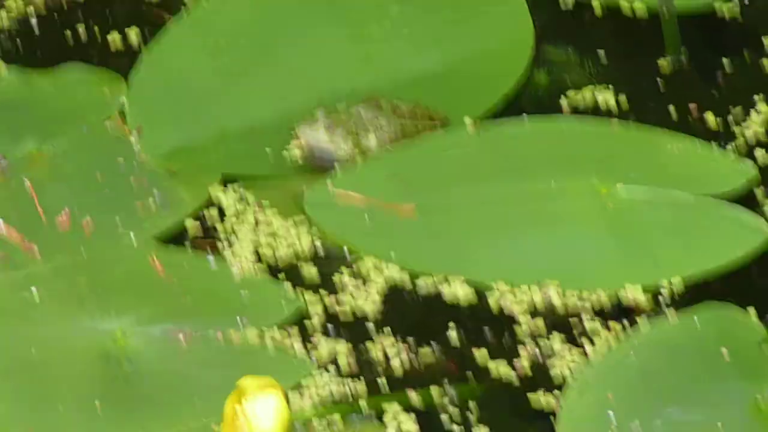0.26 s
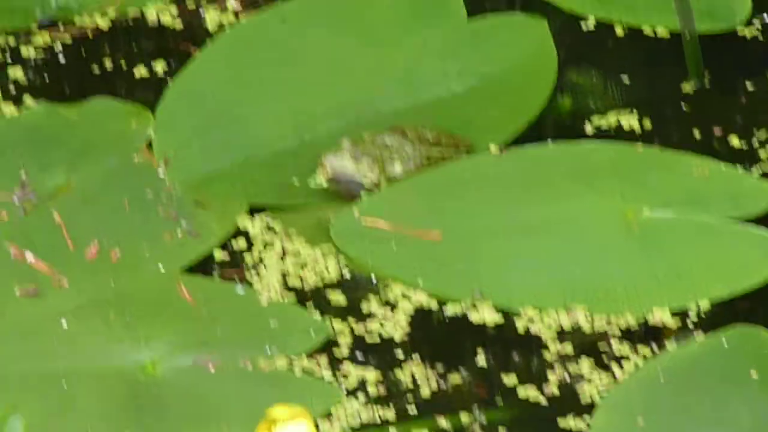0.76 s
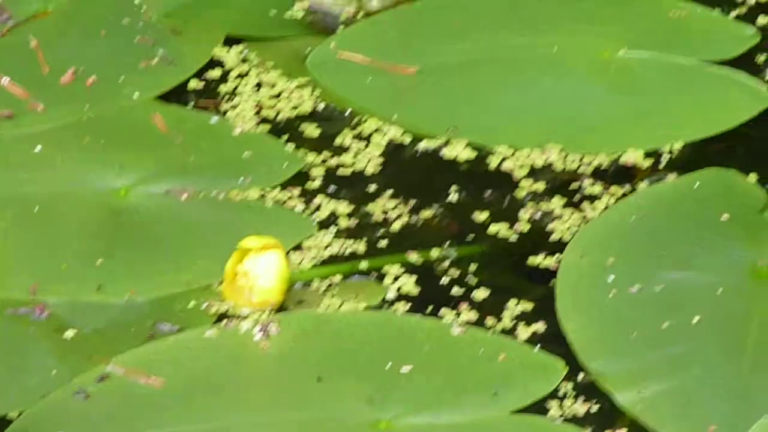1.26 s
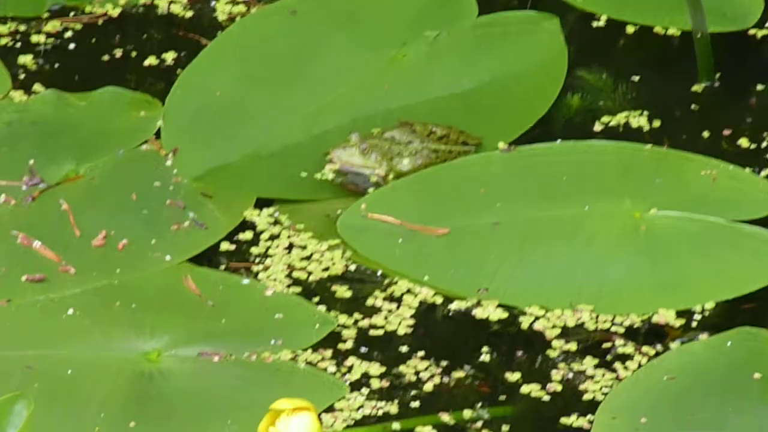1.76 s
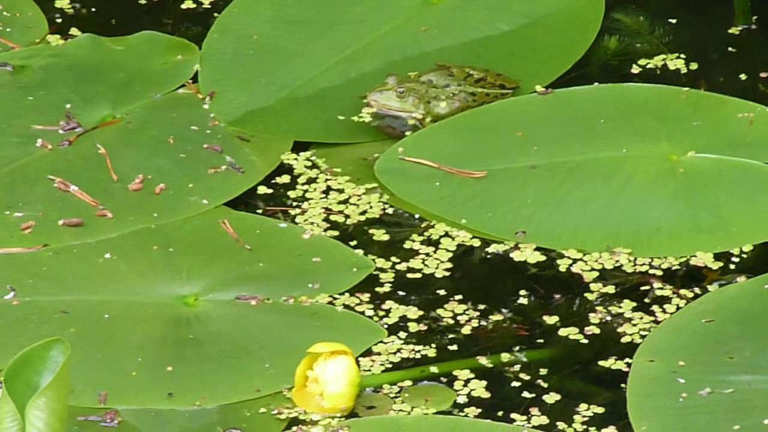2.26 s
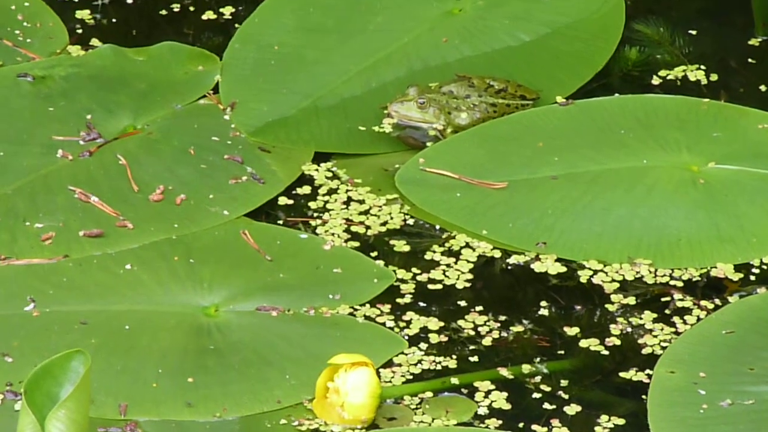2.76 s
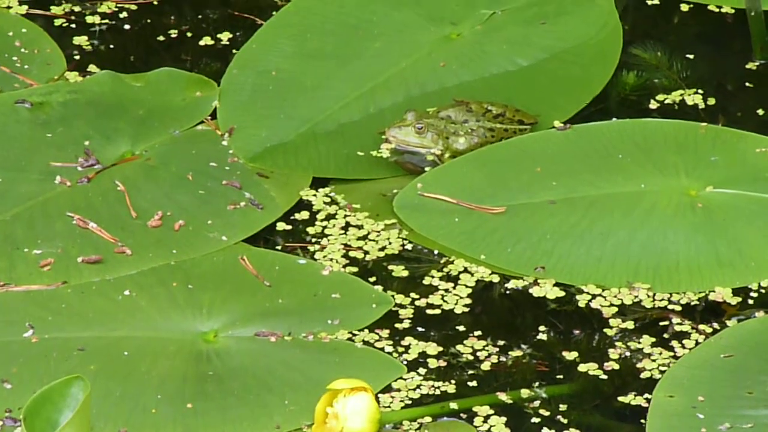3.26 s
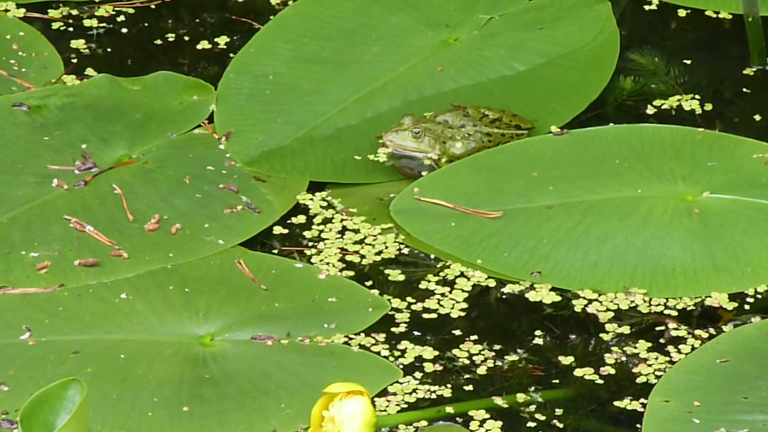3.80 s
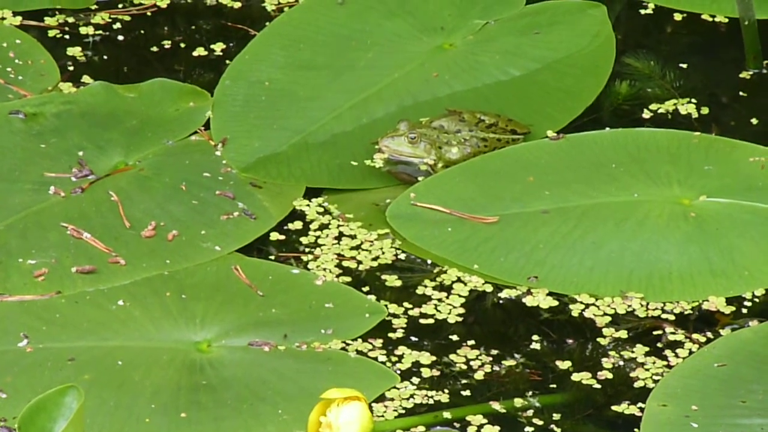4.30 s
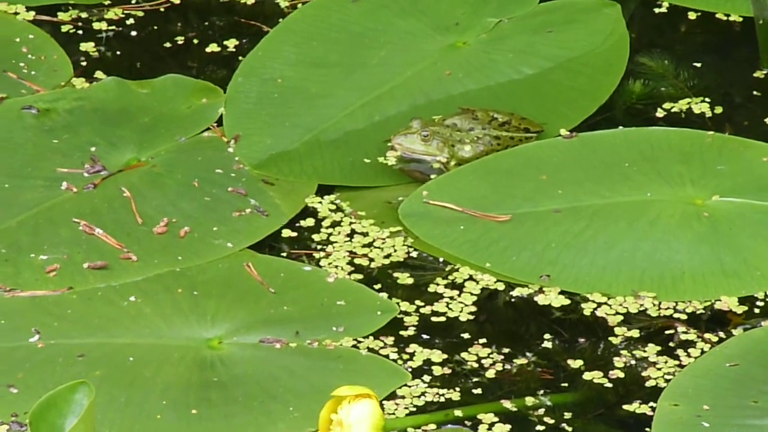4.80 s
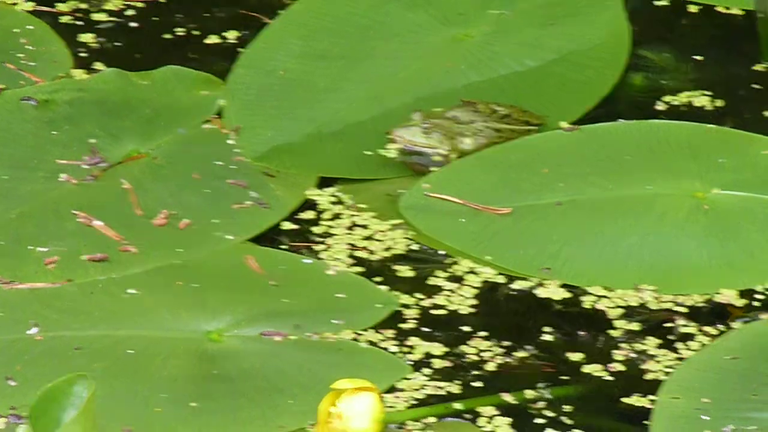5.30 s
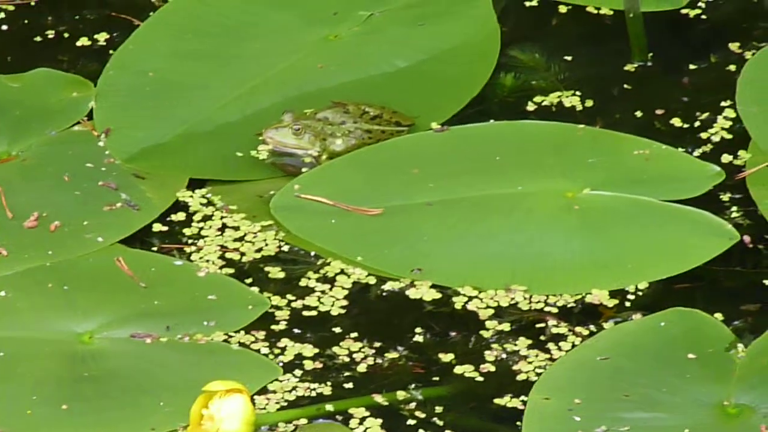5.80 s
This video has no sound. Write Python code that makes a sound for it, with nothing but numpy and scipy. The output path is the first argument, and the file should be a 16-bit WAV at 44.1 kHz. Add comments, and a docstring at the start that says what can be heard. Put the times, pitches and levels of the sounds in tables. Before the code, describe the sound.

Close, hard plastic clicks and a creak early on, then thin birdsong growing busier over faint traffic rumble and leaf hiss outdoors.

```python
"""Garden pond birds and a clicking case

Small birds sing near and far around a garden pond: wavering near-sine notes, some buzzed, some two-voiced, with
sparse echoes off trees and walls. Distant traffic and leaves are slowly swelling shaped noise, with two far
machine tones. Close by, fingers click the plastic case of a small camera: sharp releases and dying rattles ring
its modes. Its gain control then ducks the whole sound, clicks and birds alike, and its microphone colours the
sound."""
import sys
import numpy as np
from scipy import signal
from scipy.io import wavfile
from scipy.ndimage import uniform_filter1d

SR = 44100
rng = np.random.default_rng(int(sys.argv[2]) if len(sys.argv) > 2 else 0)


def digitize_waveform(pressure):
    """Quantize a signal to 16-bit integers and store it at the path in sys.argv[1].

    Rows of a 2-D input are taken as channels; values are limited to [-1, 1].
    """
    field = np.atleast_2d(pressure).T
    bounded = np.clip(field, -1, 1)
    quanta = np.round(bounded * 32767).astype(np.int16)
    wavfile.write(sys.argv[1], SR, quanta)


def field_ratio(decibels):
    """Amplitude ratio for a level in dB (20 dB per decade); scalars and array-likes work."""
    return 10 ** (np.asarray(decibels, dtype=float) / 20)


N = 266805  # length in samples


def evened(x):
    """Scales a signal to rms 1."""
    return x / np.sqrt(np.mean(x ** 2) + 1e-20)


def read(points, hz):
    """Reads a spectrum on a log-frequency axis."""
    f, value = np.transpose(points)
    return np.interp(np.log(hz + 1), np.log(f + 1), value)


def add(mix, s, sound):
    """Mixes a sound in at a time in seconds."""
    part = mix[round(s * SR):][:len(sound)]
    part += sound[:len(part)]


def wander(count, hz):
    """Smooth chance of rms 1, up to about hz: noise through two equal one-pole low-passes."""
    pole = np.exp(-2 * np.pi * hz / SR)
    noise = rng.standard_normal(count + 800)
    settled = signal.lfilter([1], [1, -2 * pole, pole ** 2], noise)[800:]
    return evened(settled)


def resonate(x, hz, width):
    """One resonance of gain 1: a complex pole, width in Hz."""
    pole = np.exp((2j * np.pi * hz - np.pi * width) / SR)
    return 2 * signal.lfilter([1 - abs(pole)], [1, -pole], x).real


def slow(curve):
    """Joins the points of a curve sample by sample."""
    s, *values = np.transpose(curve)
    return [np.interp(np.arange(N) / SR, s, v) for v in values]


def surges():
    """Gain of the far engine: a rest level with smooth bell-shaped surges added."""
    # surges of the far engine: centre_s, half_width_s, level_db
    engine_surges = [(.55, .2, -62.5), (1.5, 0.23, -61), (2.1, 0.23, -59.5), (2.95, 0.22, -57),
                     (3.38, .12, -53), (4.2, 0.33, -61), (5.5, 0.67, -68)]
    rest_db = -70
    t = np.arange(N) / SR
    return field_ratio(rest_db) + sum(field_ratio(db) * np.exp(-((t - s) / w) ** 2) for s, w, db in engine_surges)


def air():
    """Distant background: random short-time spectra, hum below and patchy leaves above, and two far tones."""
    # colour of the background before the hum and leaves are levelled: hz, relative_db_per_hz
    background = [(20, -22), (45, -2.5), (70, -3.5), (128, -6), (200, -3), (300, -5), (400, -4),
                  (700, -6.5), (1500, -12.5), (2200, -14.5), (3300, -15.5), (5000, -19.5), (6500, -29),
                  (8000, -22)]
    # slow swelling of the two layers: time_s, hum_db, leaves_db
    swell = [(0., -49, -51.5), (.6, -50, -51.5), (1.3, -50.5, -54.5), (1.92, -52, -52.5), (3., -51, -50.5),
             (4.2, -51, -52.5), (5., -51.5, -51), (6.05, -51, -49.5)]
    # steady far machine: pitch_hz, width_hz, level_db
    drone_hz, width_hz, drone_db = (79, 5, -61.5)
    frames, hz = N // 256 + 5, np.fft.rfftfreq(1024, 1 / SR)
    a, b, patches = rng.standard_normal((frames, 513, 3)).T
    patches = uniform_filter1d(patches, 10, 0)  # across frequency
    patches = evened(uniform_filter1d(patches, 12, 1))  # across time
    shape = field_ratio(read(background, hz))[:, None]
    high = 1 / (1 + (1200 / (hz[:, None] + 1)) ** 4)  # share of the leaves, half at 1200 Hz

    def layer(share):
        spectra = (a + 1j * b) * shape * share
        return evened(signal.istft(spectra, nperseg=1024, noverlap=768)[1][:N])

    hum_db, leaves_db = slow(swell)
    hum = field_ratio(hum_db) * layer(1 - high)
    leaves = field_ratio(leaves_db) * layer(high * field_ratio(1.3 * patches))
    fuzz = evened(resonate(rng.standard_normal(N), drone_hz, width_hz))
    drone = evened(np.sin(2 * np.pi * drone_hz * np.arange(N) / SR) + 0.22 * fuzz)
    engine = evened(resonate(rng.standard_normal(N), 192.2, 8.3))  # Hz, width Hz
    return hum + leaves + field_ratio(drone_db) * drone + surges() * engine


def columns(rows):
    """Start, soft-ended envelope and smoothly joined control columns of one note."""
    s, *values = np.transpose(rows)
    t = np.arange(s[0], s[-1], 1 / SR)
    ends = np.sin(np.pi / 2 * np.clip(np.minimum(t - s[0], s[-1] - t) / 0.0044, 0, 1))
    joined = [uniform_filter1d(np.interp(t, s, v), 200, mode="nearest") for v in values]
    return s[0], ends * 2 ** .5, joined  # root 2 makes the level of a sine its rms


def angle(hz, waver):
    """Phase of a voice whose pitch wavers by a small rms share."""
    wavering_hz = hz * (1 + waver * wander(len(hz), 120))
    return 2 * np.pi * (np.cumsum(wavering_hz) / SR + rng.random())


def whistles(notes, waver, flutter_db, octave_db, buzz_hz=150, swing=1.4):
    """Near-sine notes with a faint octave; a buzz shakes pitch and level, moving air makes them flutter."""
    out = np.zeros(N)
    for rows in notes:
        s, ends, (hz, db, buzz) = columns(rows)
        shake = angle(np.full(len(hz), buzz_hz), 0.33)
        phase = angle(hz, waver) + swing * buzz * np.sin(shake)
        level_shake = 1 + np.clip(buzz, 0, 1) * np.cos(shake + 1.6)
        flutter = evened(field_ratio(flutter_db * wander(len(hz), 170)) * level_shake)
        tone = np.sin(phase) + field_ratio(octave_db) * np.sin(2 * phase)
        add(out, s, ends * field_ratio(db) * flutter * tone)
    return out


def arch(u, top, start, end):
    """Zero at the share top of a note, curving to start and end at its two ends."""
    return np.where(u < top, start * (1 - u / top) ** 2, end * ((u - top) / (1 - top)) ** 2)


def glides(notes, buzz):
    """Controls of notes that slide evenly between two pitches and swell in the middle."""
    ends_db = -3.5
    u = np.linspace(0, 1, num=12)
    controls = []
    for s, length, from_hz, to_hz, db in notes:
        hz = from_hz + (to_hz - from_hz) * u
        controls.append(np.c_[s + u * length, hz, db + arch(u, .5, ends_db, ends_db), buzz + 0 * u])
    return controls


def high_birds():
    """Several birds in the trees: thin high whistles with very little octave."""
    # notes, level at mid-note: start_s, length_s, from_hz, to_hz, level_db
    peeps = [(0., .045, 3790, 4250, -58), (.045, .03, 4300, 4800, -64), (.13, 0.077, 6200, 6290, -68.5),
             (.17, 0.1, 3750, 3850, -60.5), (.238, .014, 2300, 2080, -55.5), (.245, .012, 3280, 3470, -54),
             (.415, 0.038, 5000, 4930, -55.5), (.47, .05, 4890, 4780, -64), (.55, .06, 4870, 4960, -59.5),
             (.69, .1, 4750, 4850, -62.5), (2.06, .055, 5870, 5650, -70), (2.135, 0.051, 4030, 3940, -56),
             (2.195, .015, 4800, 4360, -59), (2.465, .07, 3430, 3340, -58), (2.835, 0.022, 4370, 4430, -52),
             (3.7, 0.054, 5020, 4960, -63), (3.78, .04, 6600, 3560, -65), (3.83, 0.055, 3310, 3320, -68),
             (4., 0.044, 5900, 5080, -61.5), (4.02, 0.092, 3810, 3670, -61.5),
             (4.1, .035, 3820, 3870, -57.5), (4.082, .02, 7450, 5300, -52.5),
             (4.105, 0.038, 5000, 4070, -60), (4.13, 0.073, 4070, 3860, -58),
             (4.43, 0.026, 6600, 5550, -61.5), (4.45, .014, 5640, 4370, -56.5),
             (4.763, .022, 5800, 3930, -52), (4.785, 0.072, 3980, 3920, -53),
             (5.09, 0.032, 6570, 3400, -54), (5.125, 0.038, 3366, 3250, -50.5),
             (4.22, 0.024, 4420, 4600, -59), (4.32, .02, 5130, 5530, -61),
             (4.335, 0.097, 4455, 4420, -57.5), (4.535, .03, 4700, 4300, -60),
             (4.55, 0.012, 5220, 5600, -59), (4.608, .022, 3720, 4280, -53), (4.63, 0.035, 4280, 4300, -51),
             (4.66, 0.026, 4290, 3590, -53), (4.615, .025, 4600, 5100, -59), (4.64, .03, 5050, 4460, -59),
             (4.688, 0.025, 6570, 6020, -64), (4.715, .045, 6200, 5580, -60),
             (4.76, 0.035, 5600, 5640, -63), (4.69, 0.083, 3930, 3960, -62), (4.73, .17, 6560, 6300, -66),
             (4.78, .12, 4990, 4900, -65), (4.85, 0.063, 6100, 5580, -68.5),
             (4.88, 0.018, 4500, 4400, -53.5), (5.015, 0.056, 5280, 5140, -61),
             (5.08, 0.036, 5070, 5070, -63), (5.115, .06, 5680, 5260, -66.5),
             (5.29, 0.028, 6280, 5660, -62.5), (5.315, .03, 5650, 5460, -60),
             (5.345, 0.024, 5470, 5060, -57), (5.37, .03, 5020, 6300, -59), (5.4, .018, 6200, 5080, -57),
             (5.418, .014, 4900, 5900, -57), (5.435, .02, 4540, 3940, -56), (5.465, 0.045, 3930, 3920, -51),
             (5.505, 0.06, 4474, 4430, -47), (5.645, .115, 3990, 3550, -52),
             (5.775, 0.024, 4700, 4770, -56), (5.8, .035, 4770, 4330, -52.5),
             (5.85, 0.057, 4720, 4830, -55.5), (5.93, 0.021, 3930, 3994, -45.5),
             (5.965, 0.023, 3890, 3880, -57), (6.01, 0.028, 3500, 3740, -56)]
    return whistles(glides(peeps, buzz=0.12), waver=.005, flutter_db=2.5, octave_db=-45)


def slips():
    """Each snap as a quick run of uneven stick-slips, a creak; only the first pushes the body."""
    # snaps of the case: start_s, ring_peak_db, brightness_0_to_1, slip_count, low_push_db
    snap_table = [(.2653, -31, .6, 1, -50), (.2762, -16, .45, 7, -36), (.5317, -20, .6, 1, -50),
                  (.6122, -7, .95, 1, -22), (.6128, -12, .7, 2, -40), (.7257, -28, .5, 1, -55),
                  (.8515, -28, .9, 1, -55), (1.0904, -25, .3, 1, -40), (1.0964, -11, .8, 1, -40),
                  (1.0987, -28, .5, 1, -55), (1.103, -28, .55, 1, -55), (1.1088, -11, .4, 1, -30),
                  (1.1103, -10, .7, 4, -12), (1.1717, -27, .35, 1, -55), (1.2401, -26, .4, 1, -55),
                  (1.349, -40, .95, 1, -60)]
    gap_s, spread_db, colour = .00125, 3, .15
    ring_s, ring_s_per_db = .004, .0005  # t60 of the rattle: softer slips rattle longer
    for s, db, bright, count, push_db in snap_table:
        chances = rng.uniform(-1, 1, (count, 3)) * (np.arange(count) > 0)[:, None]  # first slip exact
        for k, (late, loud, tone) in enumerate(chances):
            slip_s = s + gap_s * (k + late / 5)
            slip_db = db + spread_db * loud
            t60 = ring_s - ring_s_per_db * slip_db
            yield slip_s, slip_db, bright + colour * tone, t60, field_ratio(push_db) * (k == 0)


def snaps():
    """A sharp release, then a dying rattle, rings the modes of the case; some push the whole body."""
    # modes of the plastic case, levels at brightness 0.5: mode_hz, width_hz, level_db
    case_modes = [(1300, 810, -20), (2150, 180, 3), (3300, 650, 0.5), (4700, 700, 2), (5800, 1280, -3.5)]
    tilt_db = 22  # dB an octave between brightness 0 and 1, about 3300 Hz
    out, t = np.zeros(N), np.arange(1500) / SR
    for s, db, bright, t60, shove in slips():
        drive = .2 * rng.standard_normal(len(t)) * field_ratio(-60 * t / t60)
        drive[0] = -1.6  # the release
        ring = np.zeros(len(t))
        for k, (hz, width_hz, mode_db) in enumerate(case_modes):
            tilted_db = mode_db + tilt_db * (bright - .5) * np.log2(hz / 3300)
            ring += (-1) ** k * field_ratio(tilted_db) * resonate(drive, hz, width_hz)
        push = -(1 - t / .0004) * np.exp(-t / .0004)
        add(out, s, field_ratio(db) * ring / abs(ring).max() + shove * push)
    return out


def chirrup(start, length, top_hz, bottom_hz, db):
    """Controls of one falling call: pitch sinks fast, then levels; loudness peaks partway."""
    fall_s, loudest_at, start_db, end_db = .03, 0.31, -17, -10
    u = np.linspace(0, 1, num=24)
    hz = bottom_hz + (top_hz - bottom_hz) * np.exp(-u * length / fall_s)
    return np.c_[start + u * length, hz, db + arch(u, loudest_at, start_db, end_db), 0.12 + 0 * u]


def stepped_call(start, knee_s, knee_hz, db, tail_db):
    """Controls of one stepped call: pitch falls to a loud shoulder, then drops to a softer tail."""
    top_hz, fall_s, start_db = 7500, 0.019, -15.5
    drop_s, tail_s, tail_hz = .011, .035, 3150
    t = np.linspace(0, knee_s + tail_s, num=40)
    after, left = np.maximum(t - knee_s, 0), np.exp(-knee_s / fall_s)
    fall = np.maximum(np.exp(-t / fall_s) - left, 0) / (1 - left)
    drop = 1 - np.exp(-after / drop_s)
    hz = knee_hz + (top_hz - knee_hz) * fall - (knee_hz - tail_hz) * drop
    level_db = db + start_db * fall + tail_db * np.minimum(2 * drop, 1)
    return np.c_[start + t, hz, level_db, 0.12 + 0 * t]


def near_bird():
    """A bird close by: falling and stepped whistled calls with a stronger octave."""
    # falling calls, level at the loudest point: start_s, length_s, top_hz, bottom_hz, level_db
    chirrups = [(0.619, 0.083, 7730, 3340, -45.5), (2.539, .085, 6990, 2740, -47)]
    # stepped calls: start_s, shoulder_after_s, shoulder_hz, level_db, tail_relative_db
    stepped = [(2.232, 0.048, 4350, -42.5, -10.5), (3.224, .046, 4660, -41.5, -18),
               (5.725, .045, 4420, -41, -7.5)]
    calls = [chirrup(*row) for row in chirrups] + [stepped_call(*row) for row in stepped]
    return whistles(calls, waver=.006, flutter_db=2, octave_db=-32)


def far_bird():
    """A bird farther off: low clear whistles, notes roughened by the buzz, and two long phrases."""
    # clear notes, level at mid-note: start_s, length_s, from_hz, to_hz, level_db
    song = [(1.55, .04, 2150, 2095, -59), (1.745, 0.031, 2850, 3300, -59), (1.77, 0.077, 3320, 3300, -55.5),
            (1.86, 0.014, 2480, 3470, -51), (1.875, .02, 2810, 1900, -53.5), (2.11, 0.028, 2690, 2695, -60),
            (3.005, .025, 2940, 2870, -51.5), (3.045, 0.026, 2930, 3250, -50.5),
            (3.11, 0.03, 2470, 2500, -55), (3.17, 0.032, 3430, 2430, -46.5), (3.575, .015, 2900, 2900, -56),
            (3.588, .014, 2690, 2670, -49.5), (3.606, 0.012, 2640, 2730, -51),
            (3.608, 0.014, 2150, 2120, -49), (3.624, .013, 2770, 2620, -51), (3.626, .016, 2210, 2020, -46),
            (3.648, 0.019, 2060, 2250, -47), (3.664, .028, 2230, 2520, -43),
            (3.735, 0.017, 1840, 2030, -53), (3.752, 0.0097, 1980, 2040, -44.5),
            (3.285, .035, 3230, 3180, -55.5), (4.2, 0.014, 3600, 2700, -57),
            (4.205, .025, 2790, 2720, -55.5), (4.25, 0.027, 3350, 3310, -55), (4.42, .025, 2020, 2150, -60),
            (4.595, .025, 2594, 2530, -50.5), (4.9, 0.066, 3217, 3390, -44.5),
            (5.025, 0.026, 2215, 2800, -45), (5.05, .022, 2700, 2230, -44), (5.24, .02, 2390, 2870, -56.5),
            (5.25, 0.019, 1950, 2260, -49), (5.27, 0.13, 1936, 1930, -59),
            (5.365, 0.016, 2220, 3280, -45.5), (5.382, 0.013, 3340, 2650, -52),
            (5.79, 0.026, 1940, 2090, -54), (5.818, .032, 2060, 2900, -45)]
    # buzzy notes, level at mid-note: start_s, length_s, from_hz, to_hz, level_db
    burrs = [(3.27, 0.029, 4740, 4920, -53), (3.3, .05, 4920, 4760, -63), (3.425, 0.026, 3620, 2960, -54),
             (4.4, 0.071, 3400, 3530, -62.5), (4.465, 0.028, 3450, 3260, -55),
             (4.405, 0.017, 3830, 3840, -56.5), (4.44, 0.014, 3720, 3940, -53),
             (4.54, 0.096, 1864, 1494, -54.5), (4.63, 0.1, 1490, 1850, -54), (4.8, 0.098, 2440, 2696, -50),
             (4.98, 0.086, 3380, 3420, -57), (5.155, .02, 4200, 4450, -48.5),
             (5.18, 0.031, 4750, 4470, -49.5), (5.33, 0.044, 2184, 1990, -51),
             (5.5, .02, 3290, 3270, -45.5), (5.52, .05, 3500, 3130, -58), (5.58, 0.1, 3150, 3220, -55),
             (5.59, .075, 4370, 4530, -48.5), (5.715, .02, 2340, 2800, -47.5),
             (5.725, 0.019, 2050, 2270, -51), (5.9, 0.035, 3150, 3150, -49)]
    # two long phrases, points in time: time_s, pitch_hz, level_db, buzz_0_to_1
    phrases = [
        [(4.745, 2220, -57.5, .7), (4.78, 2250, -47, 0.4), (4.9, 2055, -46.5, 0.57), (4.96, 2020, -52.5, 0.3),
         (5.03, 1892, -50, 0.3), (5.1, 1930, -48, .35), (5.17, 1925, -48.5, 0.2), (5.25, 1915, -53, .2)],
        [(5.395, 2658, -44.5, 0.3), (5.44, 2580, -46.5, 0.7), (5.5, 2410, -43.5, 0.3), (5.56, 2310, -54, 0.9),
         (5.61, 2530, -48.5, 0.5), (5.65, 2870, -50, 0.6), (5.69, 3150, -43.5, 0.8), (5.72, 3100, -53, .9),
         (5.76, 2900, -50, .8)],
    ]
    notes = glides(song, buzz=0.12) + glides(burrs, buzz=0.64) + phrases
    return whistles(notes, waver=.008, flutter_db=2.5, octave_db=-40)


def duet(start, top_s, low_hz, up_hz, db):
    """Controls of one harsh chirp: both pitches and the effort follow one arch."""
    length_s, sag_in, sag_out = 0.082, .27, .13  # pitch sags as shares of the top pitch
    weak_in_db, weak_out_db = -5.5, -5.5
    voices_db, sum_db = -4.5, -2.5  # voices and sum tone against the lower octave
    u, top = np.linspace(0, 1, num=24), top_s / length_s
    rise = 1 - arch(u, top, sag_in, sag_out)
    effort_db = db + arch(u, top, weak_in_db, weak_out_db)
    return np.c_[start + u * length_s, low_hz * rise, up_hz * rise,
                 effort_db + voices_db, effort_db, effort_db + sum_db]


def duets(waver=.008, flutter_db=3.5, rasp_db=3):
    """Both sides of the syrinx sing: two voices, their louder octave and sum tones, and a shared rasp."""
    # harsh chirps: start_s, top_after_s, lower_top_hz, upper_top_hz, effort_db
    chirps = [(2.387, 0.047, 2707, 3354, -51), (2.733, .028, 2350, 2846, -51.5),
              (2.903, .048, 2628, 3560, -50), (3.054, .04, 2846, 3390, -53), (3.4, .058, 2490, 2964, -49.5)]
    out = np.zeros(N)
    for row in chirps:
        s, ends, (low, up, voices_db, octave_db, sum_db) = columns(duet(*row))
        a, b = angle(low, waver), angle(up, waver)
        lines = [(a, voices_db - 3.0), (b, voices_db), (2 * a, octave_db), (a + b, sum_db),
                 (2 * b, sum_db - 7.5), (3 * a - b, octave_db - 6.0)]
        voice = np.zeros(len(a))
        for phase, db in lines:
            flutter = evened(field_ratio(flutter_db * wander(len(a), 70)))
            voice += flutter * field_ratio(db) * np.sin(phase)
        rasp = evened(field_ratio(rasp_db * wander(len(a), 500)))
        add(out, s, ends * voice * rasp)
    return out


def garden(x):
    """Sparse echoes of random sign from trees and walls, each pitch dying at its own rate."""
    # decay of the echoes: hz, t60_s
    decay = [(1500, 0.23), (4000, 0.3), (7000, 0.43)]
    taps = np.zeros(SR // 2)
    at = np.arange(100, len(taps) - 20, 20)
    taps[at + rng.integers(0, 20, len(at))] = rng.choice([-1., 1.], len(at))
    hz, t, z = signal.stft(taps, SR, nperseg=256)
    fading = z * field_ratio(-60 * t / read(decay, hz)[:, None])
    tail = signal.istft(fading, SR, nperseg=256)[1]
    return signal.fftconvolve(x, tail / np.linalg.norm(tail))[:N]


def scene():
    """Birds with their echoes, the distant background and the close clicks, at the microphone."""
    near, far, high, harsh = near_bird(), far_bird(), high_birds(), duets()
    echoes = garden(field_ratio(-3.0) * near + field_ratio(-2.5) * far + field_ratio(-1.0) * high + field_ratio(-2) * harsh)
    return (near + far + high + harsh + echoes + air() + snaps())[None]


def low_pass(x):
    """Removes everything above the highest recorded frequency."""
    return signal.sosfilt(signal.butter(12, 7510, fs=SR, output="sos"), x)


def record(dry):
    """Gain control sinks after loud clicks and creeps back; then the microphone colours the sound."""
    # microphone and band limit: hz, gain_db
    microphone = [(20, -19.5), (45, 0.48), (5800, 0.86), (6600, -2.5), (7300, -15), (7700, -35),
                  (8500, -44), (9200, -67), (22050, -94)]
    power_db = 10 * np.log10(uniform_filter1d(dry[0] ** 2, 200) + 1e-12)
    over_db = np.maximum(power_db + 30, 0)  # excess above -30 dB

    def held(s):  # sums the excess over time and leaks it away over s seconds
        return signal.lfilter([1 / SR], [1, -np.exp(-1 / (s * SR))], over_db)

    late = 300  # samples before the gain responds
    duck_db = np.r_[np.zeros(late), 18 * held(.09) + 12 * held(1.1)][:N]
    ducked = dry * field_ratio(-duck_db)
    log_gain = np.log(field_ratio(read(microphone, np.abs(np.fft.fftfreq(8192, 1 / SR)))))
    # minimum phase, causal: nothing rings before a click
    colour = np.fft.ifft(np.exp(signal.hilbert(log_gain).conj())).real[:4096]
    mix = signal.oaconvolve(ducked, colour[None])[:, :N]
    return low_pass(mix)


dry = scene()
out = record(dry)
digitize_waveform(out)
```